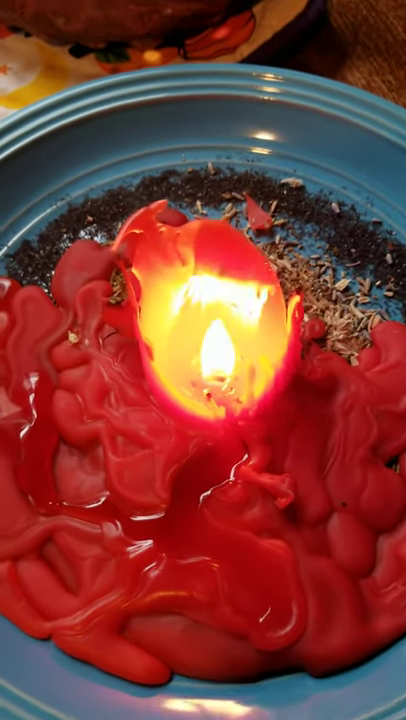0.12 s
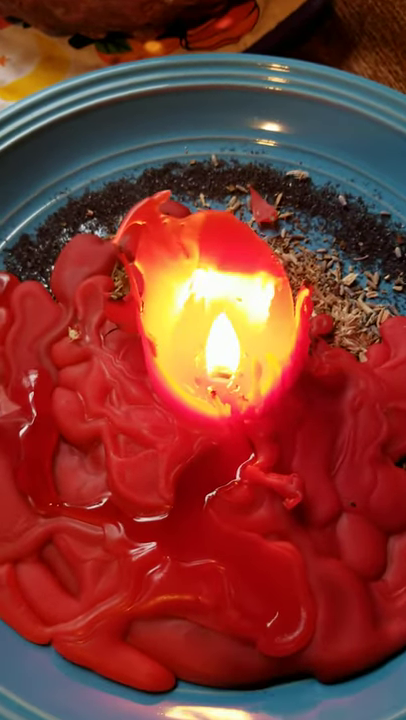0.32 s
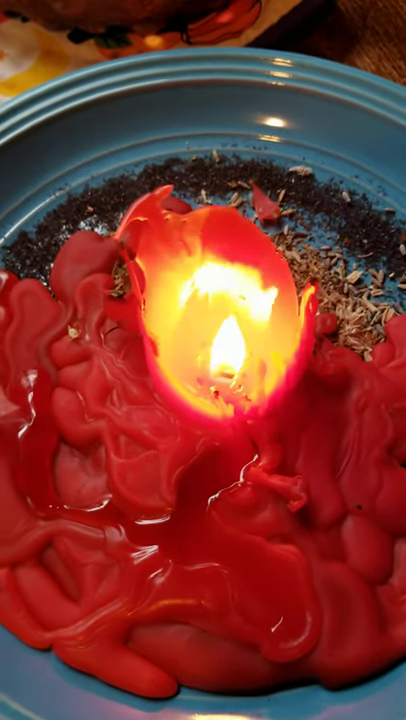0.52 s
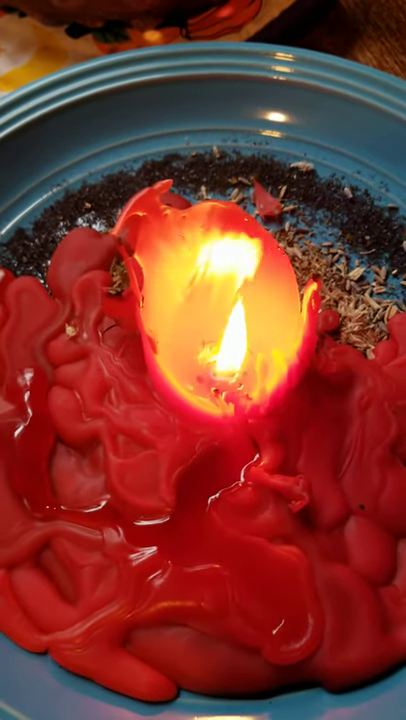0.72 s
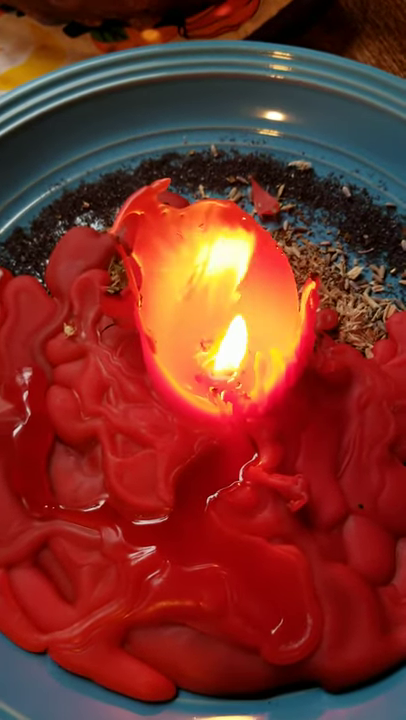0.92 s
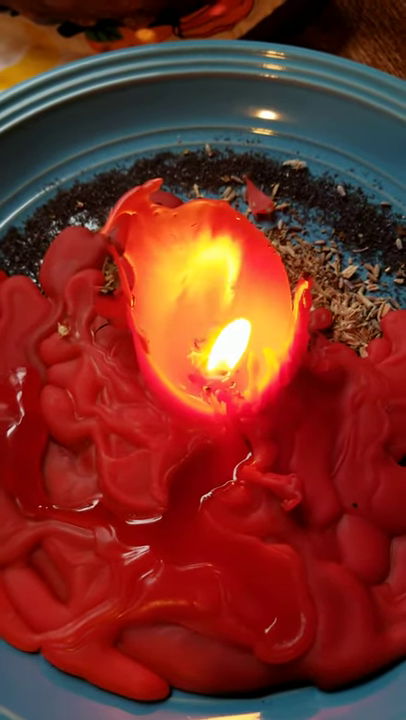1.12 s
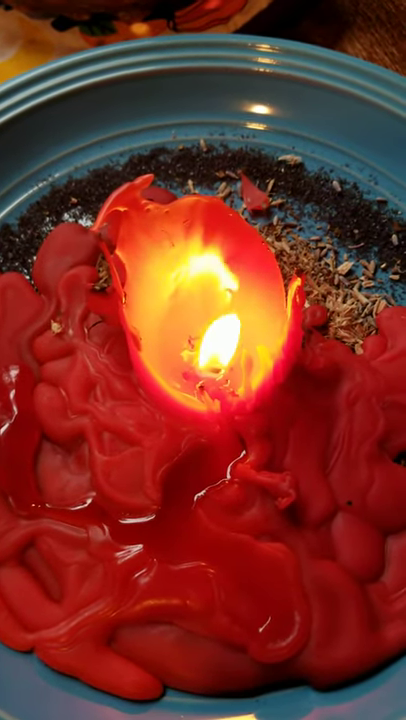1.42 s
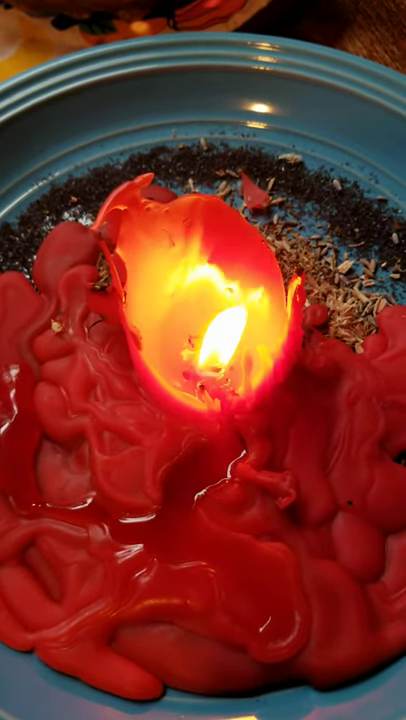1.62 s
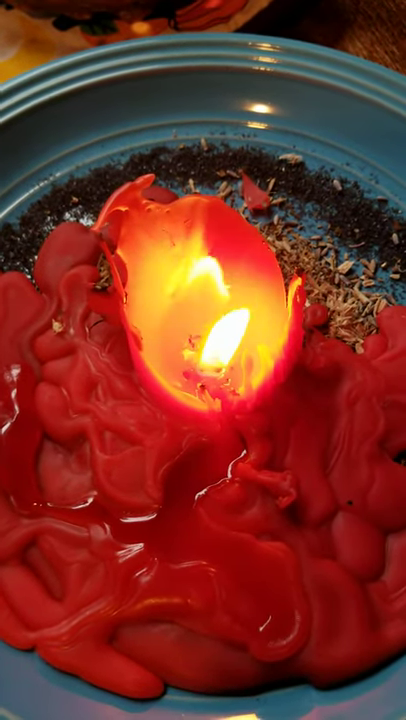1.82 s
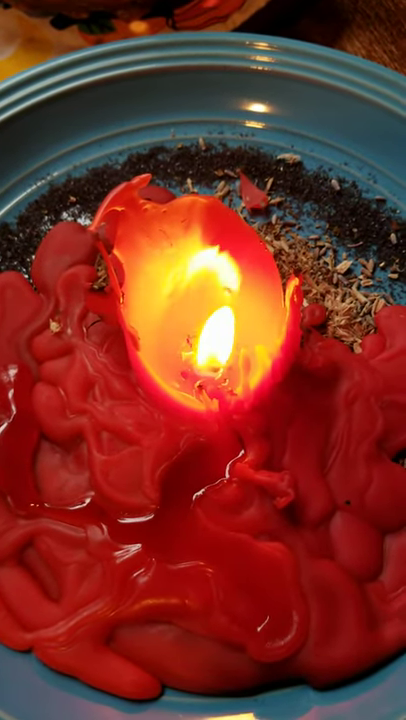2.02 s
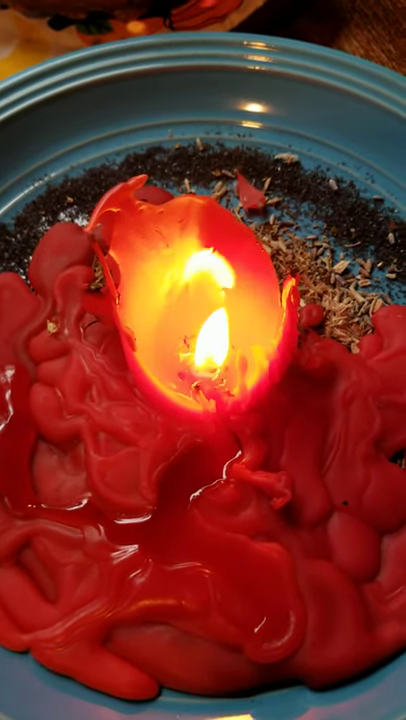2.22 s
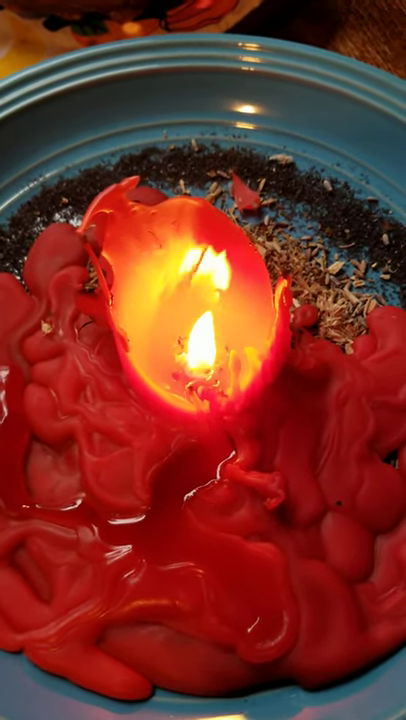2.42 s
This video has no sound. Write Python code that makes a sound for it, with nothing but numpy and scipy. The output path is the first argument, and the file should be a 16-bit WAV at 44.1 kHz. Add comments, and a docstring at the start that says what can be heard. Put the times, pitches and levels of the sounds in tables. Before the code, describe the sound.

A candle sputters in wax, miked very close in a quiet room with faint low rumble, hum and hiss. Sharp snaps break near silence at 0.24 and 0.4 seconds. From 0.56 to 0.84 pops crowd together, loudest near 0.69, with soft low puffs. From 0.85 a wet, bubbling sizzle surges unevenly, dotted with pops, until 2.05; crackles and a brief weaker fizz follow, thinning to ticks by 2.5.

```python
"""Candle sputtering in wax

A candle burns in a pool of wax on a plate, close to two microphone ports in a quiet room.
Moisture at the wick bursts in sharp pops: filtered impulses, each with a spit of noise; decaying sines puff.
A dense sizzle of random impulses and steam noise boils up, sputters and thins out to last ticks.
The plate adds a quick echo and scatter; behind lie a faint room tail, rumble, hum and hiss.
"""
import sys
import numpy as np
from scipy import signal
from scipy.fft import rfft, irfft, next_fast_len
from scipy.io import wavfile
from scipy.ndimage import uniform_filter1d, map_coordinates

SR = 44100
rng = np.random.default_rng(int(sys.argv[2]) if len(sys.argv) > 2 else 0)


def digitize_waveform(pressure):
    """Quantize a signal to 16-bit integers and store it at the path in sys.argv[1].

    Rows of a 2-D input are taken as channels; values are limited to [-1, 1].
    """
    field = np.atleast_2d(pressure).T
    bounded = np.clip(field, -1, 1)
    quanta = np.round(bounded * 32767).astype(np.int16)
    wavfile.write(sys.argv[1], SR, quanta)


N = 114660
T = np.arange(N) / SR
FFT_SIZE = 2 * next_fast_len(N // 2 + SR // 5)  # padded for the tails
HZ = np.fft.rfftfreq(FFT_SIZE, 1 / SR)

# Room noise spectra. Each row: frequency in Hz, relative density in dB per Hz.
RUMBLE_SPECTRUM = [(15, -28), (35, -12), (55, 0.5), (90, -5.5), (140, -8), (220, -20), (400, -28),
                   (1000, -40), (4000, -67)]
HISS_SPECTRUM = [(100, 3), (1300, -4), (2000, 7.5), (2900, 1.5), (4200, -9), (5500, -26), (9500, -23),
                 (11500, -0.5), (15500, -6), (16300, -31)]
# Hum tones. Each row: frequency in Hz, mean level in dB.
HUM_TONES = [(58, -69.5), (120, -72.5)]
RUMBLE_DB, HISS_DB = -65, -72  # mean of the two ports
HISS_TILT_DB, LOW_TILT_DB = 3, 1  # added at the left port, taken off at the right

# Bursts at the wick. Each row: start in seconds, crack level in dB, low plop level in dB.
POPS = [(.2388, -23, -31), (.2419, -17.5, -27), (0.2447, -9, -25.5), (0.2481, -14, -45),
        (0.383, -15.5, -36.5), (.413, -30.5, -40), (0.469, -36.5, -45), (0.563, -10, -13),
        (0.5682, -16, -17), (0.5823, -18, -22), (0.6393, -9.5, -21), (0.6715, -13.5, -32),
        (0.6759, -13, -18), (0.677, -6, -20), (.687, -1.5, -33), (.6974, -17, -45), (.702, -3.5, -16.5),
        (.717, -7.5, -17.5), (.729, -12, -15), (.74, -25, -42), (.771, -10.5, -16.5), (.793, -22, -26),
        (.803, -9.5, -21), (0.8349, -7.5, -15.5), (0.8788, -33, -14.5), (0.9312, -9.5, -26),
        (1.144, -13.5, -56), (1.2416, -12.5, -21), (1.2785, -18.5, -34), (1.312, -16, -28),
        (1.362, -14, -45), (1.466, -13, -18), (1.5011, -10, -17), (1.574, -12.5, -42), (1.5829, -12, -26),
        (1.6467, -16, -13.5), (1.7546, -15.5, -18), (1.7926, -14.5, -19), (1.8711, -8.5, -48),
        (1.9053, -11.5, -41), (2.0366, -12, -25), (2.044, -11.5, -19.5), (2.089, -15, -40),
        (2.126, -24, -27.5), (2.17, -13.5, -20), (2.1763, -25, -16.5), (2.1849, -15.5, -33),
        (2.2136, -21, -16), (2.2163, -17, -19.5), (2.2331, -11.5, -28), (2.241, -17, -40),
        (2.2676, -16.5, -20), (2.274, -16, -20), (2.297, -23, -30), (2.3222, -19.5, -20),
        (2.376, -19.5, -27), (2.433, -31.5, -55), (2.47, -23, -56), (2.4863, -20, -58)]
# Burst spectra. Each row: frequency in Hz, relative density in dB per Hz.
CRACK_SPECTRUM = [(100, -39.5), (700, -9), (1400, -5), (2700, 2.5), (7500, -0.5), (12300, 4), (16000, -3.5)]
PLOP_SPECTRUM = [(30, -26), (110, -3), (240, -1.5), (380, 2.5), (650, -3.5), (1200, -2), (2500, -5.5),
                 (4500, -10.5), (16000, -37)]
FIZZ_SPECTRUM = [(100, -18.5), (700, -1), (1300, -1), (2500, 0), (6000, 0), (15650, -1.5), (16200, -61)]
SPRAY_DB, SPRAY_T60_S = -8.5, 0.014  # spit of vapour, level relative to its crack
SPOTS = 6  # places around the wick

# Strength of the boiling. Each row: time in seconds, fizz level in dB, low bubbling level in dB.
BOIL = [(0.551, -78, -100), (0.571, -59, -50), (.65, -68.5, -68), (0.714, -47, -42.5), (.76, -65, -62.5),
        (.828, -68, -63), (0.85, -40, -47.5), (.99, -39, -45), (1.06, -40.5, -56.5), (1.111, -35.5, -55),
        (1.141, -46, -50.5), (1.26, -44, -46.5), (1.42, -45.5, -51.5), (1.551, -44, -50.5),
        (1.6, -39, -40.5), (1.63, -46, -48.5), (1.7, -38.5, -41.5), (1.78, -45.5, -51), (1.85, -47, -49),
        (1.875, -44, -44.5), (1.96, -38, -43.5), (2.049, -41.5, -51), (2.07, -52, -64), (2.15, -59, -61.5),
        (2.2, -47.5, -59), (2.272, -46, -48.5), (2.34, -52.5, -55), (2.4, -61.5, -70), (2.6, -65, -94)]
FIZZ_PER_S, FIZZ_SPREAD_DB = 5000, 6.7
BUBBLES_PER_S, BUBBLE_SPREAD_DB = 450, 5.5
SPUTTER_DB, SPUTTER_KNOTS_PER_S = 3, 200
STEAM_DB = -5.5  # relative to the fizz

# Recoil of the flame from the larger pops. Each row: start in seconds, level in dB, pitch in Hz.
PUFFS = [(.58, -45, 70), (0.639, -44, 110), (.703, -38, 130), (.717, -37, 133), (.729, -45, 153),
         (0.774, -47, 70), (0.802, -45, 80), (0.837, -46, 109)]
PUFF_T60_CYCLES = 3.7

# Phase between the ports. Each row: frequency in Hz, lead of the left port in radians.
PORT_LEAD = [(100, 0), (650, .4), (900, 1.1), (1550, .5), (1720, -.4), (1950, 1.6), (2350, 3), (3500, 3.15),
             (4000, 5.4), (4600, 5.7), (4850, 4.3), (6500, 4.5), (7100, 7.1), (7500, 5.5), (9200, 5.1),
             (9900, 6.4), (10500, 6.1), (11600, 7.8), (13150, 7.8), (13400, 9.6), (14200, 9.7),
             (15600, 11.3)]
# Balance of the wick. Each row: time in seconds, left minus right in dB.
BALANCE = [(.45, 1), (.56, -1)]
ECHO_S, ECHO_GAIN = 0.001169, 0.18
SCATTER_T60_S = 0.012
# Scatter off the lumps of wax and the rim. Each row: frequency in Hz, gain in dB.
SCATTER_GAIN = [(200, -11.5), (1000, -33), (1850, -2.5), (2450, -14.5), (3350, -10.5), (4500, -4),
                (15000, -2)]

# Decay of the room. Each row: frequency in Hz, 60 dB decay time in seconds.
ROOM_T60 = [(150, .25), (2500, 0.18), (8000, 0.23), (16000, 0.04)]
# Strength of the room tail. Each row: frequency in Hz, gain in dB.
ROOM_GAIN = [(100, -17.5), (1000, -14), (2800, -14), (6000, -17.5), (15000, -17.5)]

# Colour of the microphone ports. Each row: frequency in Hz, gain in dB.
LEFT_PORT = [(400, 2), (750, -3.5), (1100, 0), (1680, -1), (1850, -9), (2300, 4.5), (2750, 10.5), (3250, 4),
             (3930, -3.5), (4450, 3.5), (5050, 3.5), (5450, 0), (5950, 3.5), (6750, -2.5), (7400, 3),
             (8400, .5), (11200, 0), (12000, 2.5), (13300, 0), (15000, -1), (15600, 2)]
RIGHT_PORT = [(400, 1.5), (650, -3.5), (1250, -4.5), (1680, -5), (2000, 9), (2400, 6), (2800, 9), (3350, 2),
              (4300, 0), (5250, -10), (5900, 0), (6800, -1), (7700, -6), (9100, -6), (9700, -1),
              (10150, -4), (11100, -1.5), (11550, 5), (12000, 1), (12350, 6), (12850, -1), (13200, 4),
              (14250, 2), (15000, -3), (15500, -1)]
MIC_GAIN_DB = -1.5
TOP_HZ = 16700

LEFT_RIGHT = np.array([[1], [-1]])


def amp(db):
    """Decibels to gain."""
    return 10 ** (np.asarray(db) / 20)


def unit(x):
    """Scale to rms 1."""
    return x / np.sqrt(np.mean(x ** 2) + 1e-20)


def along(points, hz=HZ):
    """Read a table on a log-frequency axis."""
    table = np.transpose(points)
    return np.interp(np.log(hz + 1), np.log(table[0] + 1), table[1])


def causal(gain):
    """Minimum-phase response with the given gain, by folding the cepstrum."""
    cepstrum = irfft(np.log(np.maximum(gain, 1e-6)))
    cepstrum[1:FFT_SIZE // 2] *= 2
    cepstrum[FFT_SIZE // 2 + 1:] = 0
    return np.exp(rfft(cepstrum))


def filtered(x, response):
    """Pass x through a frequency response."""
    return irfft(rfft(x, FFT_SIZE) * response, FFT_SIZE)[..., :N]


def coloured(x, spectrum):
    """Causal colouring that keeps the energy of a white input."""
    return filtered(x, causal(unit(amp(along(spectrum)))))


def wobble(knots_per_s):
    """Smooth random curve through normal knots."""
    knots = rng.standard_normal(4000)
    return map_coordinates(knots, [T * knots_per_s], mode="wrap")


def background():
    """Wavering low rumble and hum, nearly alike at both ports, with a thin hiss separate at each."""
    shared = rng.standard_normal(N)
    separate = .25 * rng.standard_normal((2, N))
    rumble = coloured(shared + separate, RUMBLE_SPECTRUM)
    rumble = rumble * amp(RUMBLE_DB + 2.5 * wobble(11))
    hum = np.zeros(N)
    for hz, db in HUM_TONES:
        level = np.sqrt(2) * amp(db + 3 * wobble(10))
        hum += level * np.sin(2 * np.pi * hz * T + .6 * wobble(8))
    hiss = coloured(rng.standard_normal((2, N)), HISS_SPECTRUM)
    hiss = hiss * amp(HISS_DB + HISS_TILT_DB * LEFT_RIGHT)
    return (rumble + hum) * amp(LOW_TILT_DB * LEFT_RIGHT) + hiss


def placed(x):
    """Share the samples out at random among a few spots around the wick."""
    spot = rng.integers(SPOTS, size=N)
    return x * (spot == np.arange(SPOTS)[:, None])


def pops():
    """Each bubble bursts with a crack, a low plop and a short spit of vapour."""
    cracks, plops, spray = np.zeros((3, N))
    t = np.arange(SR // 30) / SR
    for start_s, crack_db, plop_db in POPS:
        i = round(start_s * SR)
        cracks[i] += amp(crack_db)
        plops[i] += amp(plop_db)
        spit = rng.standard_normal(len(t)) * amp(-60 * t / SPRAY_T60_S)
        spray[i:i + len(t)] += amp(crack_db + SPRAY_DB) * spit / np.linalg.norm(spit)
    return coloured(placed(cracks + spray), CRACK_SPECTRUM) + coloured(placed(plops), PLOP_SPECTRUM)


def plate(spots):
    """Each spot is heard directly, off the plate, and scattered by the wax in its own way for each port."""
    lead = np.exp(.5j * along(PORT_LEAD) * LEFT_RIGHT)
    echo = ECHO_GAIN * np.exp(-2j * np.pi * HZ * ECHO_S)
    direct = filtered(spots.sum(axis=0), lead * (1 + echo))
    t = np.arange(SR // 50) / SR
    paths = rng.standard_normal((2, SPOTS, len(t))) * amp(-60 * t / SCATTER_T60_S)
    paths = paths / np.linalg.norm(paths, axis=2, keepdims=True)
    scattered = signal.oaconvolve(spots[None], paths, axes=2).sum(axis=1)[:, :N]
    return direct + filtered(scattered, amp(along(SCATTER_GAIN)))


def room(spots):
    """Faint diffuse tail of decaying noise, different for each spot and port, shortest in the top treble."""
    noise = rng.standard_normal((2, SPOTS, SR // 3))
    hz, t, bands = signal.stft(noise, SR, nperseg=256)
    decay = amp(-60 * t / along(ROOM_T60, hz)[:, None])
    tails = signal.istft(bands * decay, SR, nperseg=256)[1]
    tails = tails / np.linalg.norm(tails, axis=2, keepdims=True)
    diffuse = signal.fftconvolve(spots[None], tails, axes=2).sum(axis=1)[:, :N]
    return filtered(diffuse, amp(along(ROOM_GAIN)))


def bursts(rate_per_s, spread_db, swell_db):
    """Random impulses of uneven size and either sign, with a steady short-term rms of 1."""
    struck = rng.random(N) < rate_per_s / SR
    size_db = spread_db * np.clip(rng.standard_normal(N), -2, 2)
    x = struck * amp(size_db + swell_db) * rng.choice([-1, 1], N)
    power = uniform_filter1d(x ** 2, size=2600)
    return x / np.sqrt(np.abs(power) + 1e-6)


def sizzle():
    """Swarms of tiny bursts over a wisp of steam, and fewer, larger bubbles; they sputter together."""
    time_s, fizz_db, bubble_db = np.transpose(BOIL)
    sputter_db = SPUTTER_DB * wobble(SPUTTER_KNOTS_PER_S)
    steam = amp(STEAM_DB) * unit(amp(sputter_db) * rng.standard_normal(N))
    fizz = bursts(FIZZ_PER_S, FIZZ_SPREAD_DB, sputter_db) + steam
    fizz = fizz * amp(np.interp(T, time_s, fizz_db))
    bubbles = bursts(BUBBLES_PER_S, BUBBLE_SPREAD_DB, sputter_db)
    bubbles = bubbles * amp(np.interp(T, time_s, bubble_db))
    return coloured(placed(fizz), FIZZ_SPECTRUM) + coloured(placed(bubbles), PLOP_SPECTRUM)


def puffs():
    """The flame is pushed aside and swings back: a soft thump of about one cycle."""
    out = np.zeros(N)
    for start_s, db, hz in PUFFS:
        cycles = np.maximum(T - start_s, 0) * hz
        out -= amp(db - 60 * cycles / PUFF_T60_CYCLES) * np.sin(2 * np.pi * cycles)
    return out


def scene():
    """The wick, the flame, the plate and the room as the two ports hear them."""
    wick = pops() + sizzle()
    flame = puffs()
    balance_db = np.interp(T, *np.transpose(BALANCE))
    pan = amp(.5 * balance_db * LEFT_RIGHT)
    heard = pan * plate(wick) + flame + room(wick + flame / SPOTS)
    ports = np.array([causal(amp(along(port))) for port in (LEFT_PORT, RIGHT_PORT)])
    return filtered(heard, ports * amp(MIC_GAIN_DB)) + background()


def record(dry):
    """Steep zero-phase low-pass at the band limit."""
    return filtered(dry, 1 / np.sqrt(1 + (HZ / TOP_HZ) ** 160))


dry = scene()
out = record(dry)
digitize_waveform(out)
```